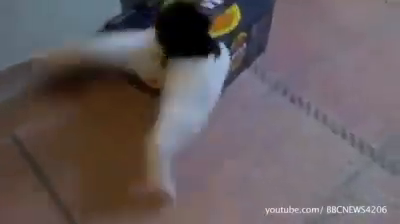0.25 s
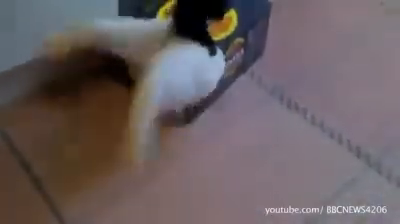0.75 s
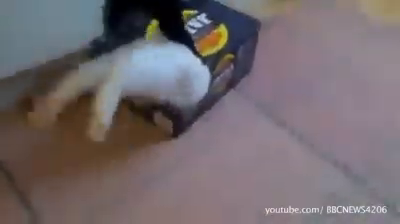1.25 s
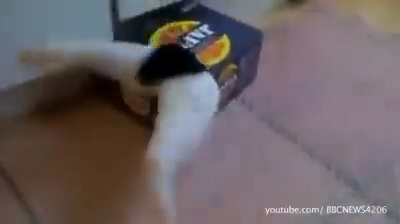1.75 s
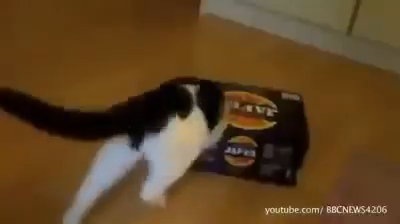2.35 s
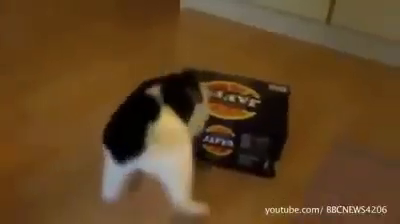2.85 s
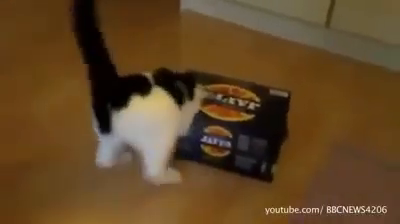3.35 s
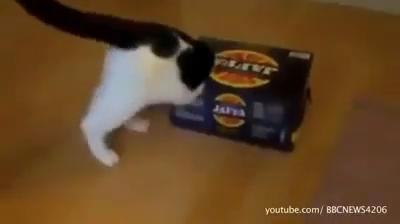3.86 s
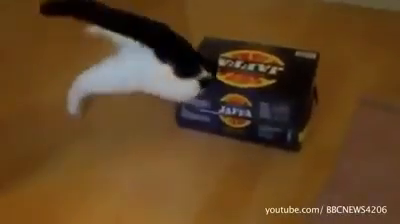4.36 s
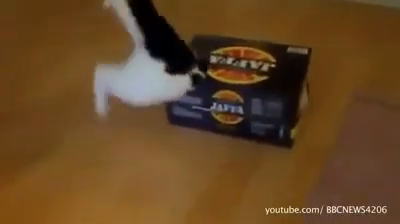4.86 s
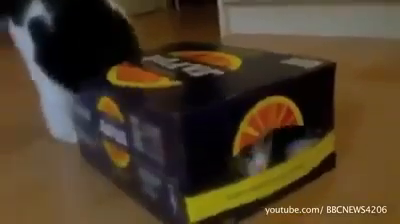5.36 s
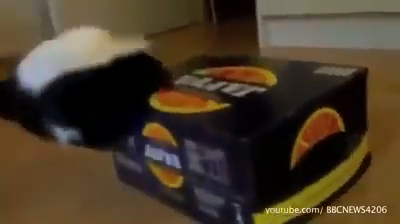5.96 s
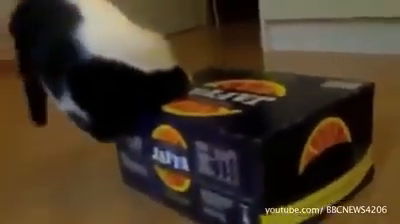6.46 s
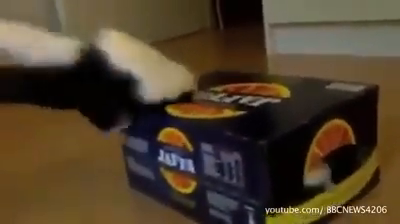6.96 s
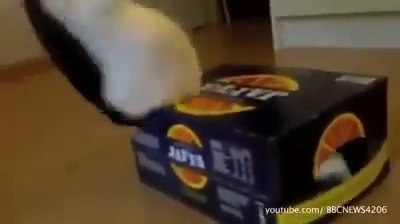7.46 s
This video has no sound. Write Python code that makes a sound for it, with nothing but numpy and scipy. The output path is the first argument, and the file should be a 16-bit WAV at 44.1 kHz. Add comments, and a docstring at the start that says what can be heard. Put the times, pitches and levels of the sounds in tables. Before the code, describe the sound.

Cardboard drags and stutters over tiles then wood indoors, claws ticking and scratching, flaps rattling, two hard boxy thumps late, over faint hiss and hum.

```python
"""Kitten pushing a cardboard box

A kitten shoves its head into a box and pushes it over tiles, then over a wooden floor, then close by.
Shaped showers of tiny slips make the dragging strokes and claw scratches; narrow noise makes brief chatter.
Short rings with a snap make ticks, damped box modes make knocks, and showers of dull contacts rattle the flaps.
A decaying noise tail is the bare room; the camera adds hiss, sine-wave mains hum and low handling rumble."""
import sys
import numpy as np
from scipy import signal
from scipy.fft import rfft, irfft, next_fast_len
from scipy.io import wavfile
from scipy.ndimage import map_coordinates

SR = 44100
rng = np.random.default_rng(int(sys.argv[2]) if len(sys.argv) > 2 else 0)


def master(y):
    """Save y as 16-bit WAV."""
    cut = np.clip(np.atleast_2d(y).T, -1, 1)
    pcm = np.round(cut * 32767)  # scale
    wavfile.write(sys.argv[1], SR, pcm.astype(np.int16))


N = 339383

# pushes that slide the box: (start [s], rise [s], hold [s], fade t60 [s], drag [dB], claw scratch re drag [dB])
PUSH_STROKES = [(-.03, 0.037, 0.0031, .4, -35, -9.5), (.01, 0.093, 0, 0.7, -26, -4.5),
                (0.351, 0.05, 0.029, 0.23, -43.5, -7.5), (0.493, 0.085, 0, 1.04, -43.5, -9),
                (0.682, 0.027, 0.0066, 0.72, -32.5, -6), (0.852, 0.011, 0.063, 0.37, -45.5, -3.5),
                (0.938, 0.039, 0.031, 0.2, -51, -3.5), (1.413, .05, 0.033, 2.5, -51, -8.5),
                (1.475, 0.068, 0.052, 0.32, -38, -11.5), (1.978, 0.036, 0.017, 0.19, -43.5, -0.5),
                (2.398, 0.012, 0.03, 0.24, -37.5, 0), (2.454, 0.02, 0.038, 4.4, -51, -8),
                (2.71, 0.042, 0, 0.31, -44.5, 3), (2.85, 0.046, 0.02, 0.42, -44.5, 10),
                (2.91, 0.039, 0.0045, .3, -38.5, 8.5), (3.021, 0.03, 0.022, 0.39, -42, 4),
                (3.091, 0.12, 0.1, 1.35, -44.5, -2.5), (3.282, 0.032, 0.028, 0.14, -50, 7.5),
                (3.461, 0.088, 0.042, 0.091, -44.5, 4.5), (3.568, 0.026, 0, 0.019, -44.5, 19),
                (3.635, 0.024, 0.1, 1.1, -41.5, -7), (3.714, 0.053, 0.015, 0.33, -37.5, -1.5),
                (3.824, 0.043, 0.085, 1.1, -39.5, -3.5), (3.97, 0.092, 0.018, 0.073, -44.5, 1.5),
                (4.134, .017, 0.0063, 0.37, -37.5, 5), (4.146, 0.03, 0, 0.088, -41, 18.5),
                (4.186, 0.064, 0.00099, 0.84, -32.5, 2.5), (4.378, 0.046, 0.079, 0.33, -39.5, -7),
                (4.447, .12, 0.0058, 3.96, -46.5, -4), (5.668, 0.024, 0.068, 1.03, -41.5, -9.5),
                (5.97, 0.11, 0.032, 0.72, -37, -7.5), (6.313, 0.026, 0.069, 2, -49.5, -6),
                (6.553, 0.14, .02, 1, -51, -5), (6.856, 0.065, 0.095, 1, -51.5, -7.5),
                (6.992, 0.084, 0.047, 1.31, -32, -14.5), (7.321, 0.037, 0, .6, -33.5, -14.5),
                (7.49, 0.072, .08, .5, -50, -7.5), (7.614, 0.023, 0.12, .5, -40.5, -8.5)]
# friction colour on tiles, on wood and close by: (frequency [Hz], relative level [dB])
TILE_FRICTION = [(90, -12.5), (250, -7.5), (600, -4.5), (950, 5.5), (1300, 4), (1900, 4.5), (2550, 2),
                 (3600, -6.5), (4600, -13.5), (6000, -21.5), (7500, -38), (10000, -61)]
WOOD_FRICTION = [(70, -14.5), (160, -1.5), (450, 0), (900, -6), (1500, -7), (2400, -8), (3200, -5),
                 (4000, -2.5), (5000, -6), (6000, -10.5), (7000, -22.5), (8000, -33), (10000, -51.5)]
NEAR_FRICTION = [(90, -28), (250, -7), (600, -8), (850, 0), (1150, 3), (1500, 0), (2000, 0), (2900, -7.5),
                 (3500, -13.5), (4300, -15), (5000, -18), (6300, -25), (7500, -39.5), (10000, -62.5)]
# resonances of a chattering card edge: (start [s], end [s], centre [Hz], width [Hz], level fully swelled [dB])
EDGE_CHATTER = [(1.999, 2.066, 875, 252, -38.5), (2.738, 2.816, 2720, 415, -42.5),
                (2.922, 3.01, 3730, 305, -36.5), (3.652, 3.93, 1090, 260, -45),
                (4.024, 4.107, 5750, 302, -47.5), (4.139, 4.24, 4050, 524, -33.5),
                (4.381, 4.437, 3740, 250, -38), (7.016, 7.17, 1106, 70, -36.5),
                (7.053, 7.333, 3700, 1000, -52), (7.626, 7.742, 2270, 280, -40),
                (7.62, 7.742, 3530, 595, -47.5)]
# claws and flap edges ticking on card: (time [s], peak [dB], panel [Hz], ring t60 [s], snap re ring [dB])
CARD_TAPS = [(0.161, -17, 2500, .018, 4), (0.6502, -19, 870, 0.0061, 12), (0.696, -17.5, 1316, 0.005, -2.5),
             (0.72, -18.5, 2550, .018, -7), (0.873, -26, 1480, 0.017, 9.5),
             (1.433, -35.5, 1290, 0.0095, -2), (1.532, -21.5, 1600, 0.012, -2), (1.993, -20, 745, 0.02, 3),
             (1.997, -22, 956, 0.02, -5), (2.0215, -18.5, 880, 0.016, 6.5), (2.023, -24, 4720, .009, 4),
             (2.409, -22.5, 825, .014, 11), (2.735, -15, 2890, .0097, 6), (2.858, -28, 4020, .012, 5),
             (2.941, -17, 4370, 0.013, 2.5), (3.056, -24, 5260, 0.0097, 4.5),
             (3.588, -16.5, 4080, 0.025, 3), (3.662, -23.5, 1150, 0.019, -2.5),
             (4.149, -15.5, 840, 0.02, 12), (4.173, -15, 4270, .01, 0), (4.2393, -17.5, 3900, 0.0055, 1),
             (4.3955, -18, 3750, 0.007, -3.5), (4.435, -22.5, 1320, 0.014, 0), (4.866, -26, 1170, 0.005, 9),
             (7.339, -11.5, 1456, .0065, -9.5), (7.3685, -21, 1840, 0.019, -14),
             (7.636, -21, 2310, .019, 6)]
# box buckling and knocking on the floor: (time [s], peak before bass cut [dB], boost of the hollow mode [dB])
BOX_KNOCKS = [(5.68, -6, -4.5), (5.7007, -26.5, -14), (5.706, -26.5, 1), (5.7117, -19.5, 1.5),
              (5.7557, -32, 2), (5.7575, -29, -2), (6.348, -22, 1.5), (6.356, -26, 12.5), (6.377, -25.5, 9),
              (7.341, -6, 10.5), (7.3623, -22, 0.5), (7.3702, -22, 19), (7.3772, -20.5, 7)]
# hollow, lid, side and base-sway modes: (mean pitch [Hz], relative level [dB], t60 before blow scaling [s])
BOX_MODES = [(545, 19.5, 0.021), (1137, 21.5, 0.014), (890, -26, 0.0053), (95, -42, 0.026)]
# colour of a sharp release or crack of the card: (frequency [Hz], relative level [dB])
SNAP_COLOUR = [(100, 1), (600, -5), (2000, 12.5), (4300, 9.5), (6000, -6.5), (8000, -27.5), (10000, -56)]
# loose flaps rattling after a knock, a tap or a shove: (time [s], level [dB], t60 [s])
FLAP_RATTLES = [(1.995, -40.5, 0.24), (4.15, -33, 0.56), (5.686, -27, 0.25), (5.751, -26.5, 0.2),
                (6.346, -32.5, 0.58), (7.352, -31, 0.47), (7.38, -38, 0.96)]
# colour of the flap contacts: (frequency [Hz], relative level [dB])
FLAP_COLOUR = [(70, -18), (160, 0), (300, 3), (550, 3), (800, 3), (1150, 3.5), (1600, -7), (2100, -7),
               (3000, -33), (5500, -36.5), (9000, -59.5)]
# reverberation of the bare room: (frequency [Hz], t60 [s])
ROOM_DECAY = [(150, 0.63), (1000, 0.66), (4000, 0.53), (9000, 0.55)]
# faint stereo width, side level of a noise tail by frequency: (frequency [Hz], side level [dB])
SIDE_WIDTH = [(100, -29.5), (700, -36.5), (1400, -35.5), (2500, -27.5), (5000, -28), (7000, -35)]
# colour of the hiss before its low cut: (frequency [Hz], relative level [dB])
HISS_COLOUR = [(50, -20.5), (120, -8.5), (250, -9), (500, -14.5), (1000, -16), (2000, -19), (4000, -24.5),
               (5500, -27), (7000, -36), (10000, -62.5)]
# mains hum harmonics: (frequency [Hz], rms level [dB])
MAINS_HUM = [(50, -76), (100, -70.5), (150, -68), (250, -69), (300, -83), (350, -85.5), (500, -68.5),
             (700, -69), (1150, -73), (1200, -72.5)]
# tremor of the hand on the camera: (time [s], rumble level [dB])
HAND_TREMOR = [(0, -61), (4.4, -64), (5.2, -67), (7.7, -84)]
# shifts of the grip: (time [s], added rumble level [dB], t60 [s])
GRIP_BUMPS = [(.68, -42.5, 0.64), (1.2, -53.5, 1.5)]

# where the box is pushed: (from [s], to [s])
ON_TILES, ON_WOOD, CLOSE_BY = (-1, 2.36), (2.36, 5.6), (5.6, 7.7)
SWELL_POWER = 1.37  # a slide gathers speed as this power of time
REFERENCE_DB = -40  # drag level at which flex_db sets the flex
RING_FACTOR, RING_GROWTH = 0.96, 0.29  # ring scaling of a full-scale knock; its growth as a power of the blow
CRACK_DB, CRACK_SLOPE = -26.5, -0.26  # crack re thump in a full-scale knock; its change per dB of blow
TOP_HZ = 10100


def scrape(span, colour, flex_db, flex_growth, flex_hz, claw_hz, rate, spread_db, clump_db):
    """Stick-slip friction: the base drags in the middle range, claws scratch above it, the walls flex below."""
    drag_level, claw_level = pushes(span)
    # the walls give even under a light push, so their level grows more slowly than the drag
    flex_level = amp(REFERENCE_DB + flex_db) * (drag_level / amp(REFERENCE_DB)) ** flex_growth

    def rub(band):
        """A fresh shower of slips, coloured by the surface and kept to one band."""
        grains = slips(rate, spread_db, clump_db)
        return unit(filtered(grains, lambda hz: amp(along(colour, hz)) * band(hz)))

    drag = rub(lambda hz: above(hz, flex_hz, order=6) * below(hz, claw_hz, order=6))
    claws = rub(lambda hz: above(hz, claw_hz, order=8))
    flex = rub(lambda hz: below(hz, flex_hz, order=6))
    return drag_level * drag + claw_level * claws + flex_level * flex


def pushes(span):
    """Drag and claw levels of the pushes that start in a span: each swells, holds, then dies as the box stops."""
    t = np.arange(N) / SR
    drag_power, claw_power = np.zeros(N), np.zeros(N)
    for start, rise, hold, t60, db, claw_db in PUSH_STROKES:
        if span[0] <= start < span[1]:
            swell = np.clip((t - start) / rise, 0, 1) ** SWELL_POWER
            fade_db = -60 * np.maximum(t - start - rise - hold, 0) / t60
            power = (swell * amp(db + np.maximum(fade_db, -120))) ** 2
            drag_power += power
            claw_power += power * amp(claw_db) ** 2
    return np.sqrt(drag_power), np.sqrt(claw_power)


def slips(rate, spread_db, clump_db):
    """Sparse random impulses, rate per second, of either sign and uneven size; clump_db sways their strength."""
    chosen = rng.random(N) < rate / SR
    sizes = rng.choice([-1, 1], N) * amp(spread_db * rng.standard_normal(N))
    return chosen * sizes * amp(clump_db * wobble(130))


def chatter(rise_s=0.019, fall_s=0.041):
    """An edge locks on to one resonance for a moment: a short swell of narrow-band noise."""
    t, out = np.arange(N) / SR, np.zeros(N)
    for start, end, centre_hz, width_hz, db in EDGE_CHATTER:
        noise = rng.standard_normal(N)
        ring = unit(filtered(noise, lambda hz: 1 / (1 + (2 * (hz - centre_hz) / width_hz) ** 2)))
        swell = np.clip(np.minimum((t - start) / rise_s, (end - t) / fall_s), 0, 1)
        out += amp(db) * swell * ring
    return out


def taps(snap_s=0.00093, attack_s=0.00034, let_go_s=0.001284, crackle_db=-19):
    """Each tick is one sharp release amid a brief crackle, and a short ring of the panel that was touched."""
    out, t = np.zeros(N), np.arange(SR // 10) / SR
    for s, db, panel_hz, t60, snap_db in CARD_TAPS:
        ring = np.sin(2 * np.pi * panel_hz * t) * dying(t, t60) * (1 - np.exp(-t / attack_s))
        crackle = amp(crackle_db) * rng.standard_normal(len(t)) * peaked(t * np.exp(-t / snap_s))
        release = np.sinc((t - let_go_s) * SR)
        snap = filtered(release + crackle, lambda hz: amp(along(SNAP_COLOUR, hz)))
        tick = peaked(ring) + amp(snap_db) * peaked(snap)
        add(out, s, amp(db) * peaked(tick))
    return out


def knocks(contact_s=0.0011, thud_s=0.00045, thud_db=3, crack_s=0.0007, bass_hz=90):
    """A soft blow pushes the wall once, cracks the card and rings the heavily damped modes of the box."""
    out, t = np.zeros(N), np.arange(SR // 10) / SR
    lead = SR // 100  # silent lead-in for the zero-phase filter
    for s, db, hollow_db in BOX_KNOCKS:
        crack_db = CRACK_DB + CRACK_SLOPE * db
        length = RING_FACTOR * amp(db) ** RING_GROWTH  # harder blows ring longer
        modes = []
        for hz, level, t60 in BOX_MODES:
            pitch = hz * rng.normal(1, 0.0064)  # every blow lands a little differently in pitch
            modes.append(amp(level) * dying(t, t60 * length) * np.sin(2 * np.pi * pitch * t))
        hollow, *panels = modes
        ring = (amp(hollow_db) * hollow + sum(panels)) * (1 - np.exp(-t / contact_s))
        # the wall gives way and springs back in one broad pulse
        push = amp(thud_db) * peaked(t * (2 - t / thud_s) * np.exp(-t / thud_s))
        burst = rng.standard_normal(len(t)) * t * np.exp(-t / crack_s)
        crack = filtered(burst, lambda hz: amp(along(SNAP_COLOUR, hz)))
        thump = filtered(np.pad(ring + push, (lead, 0)), lambda hz: below(hz, 2000, order=4))[lead:]
        add(out, s, -amp(db) * peaked(peaked(thump) + amp(crack_db) * peaked(crack)))
    # a small box radiates little bass
    return filtered(out, lambda hz: (1j * hz / (bass_hz + 1j * hz)) ** 2)


def dying(t, t60, grip=1.4):
    """The pressing paw damps the card ever harder, so a ring ends abruptly."""
    return amp(-60 * (t / t60) ** grip)


def rattles(rise_s=0.003):
    """A dying shower of tiny dull contacts between flaps and walls."""
    t = np.arange(SR) / SR
    power = np.zeros(N)
    for s, db, t60 in FLAP_RATTLES:
        level = amp(db - 60 * t / t60) * (1 - np.exp(-t / rise_s))
        add(power, s, level ** 2)
    contacts = slips(rate=2600, spread_db=3.5, clump_db=0)
    return np.sqrt(power) * unit(filtered(contacts, lambda hz: amp(along(FLAP_COLOUR, hz))))


def room(x):
    """Hard floor and walls: after 10 ms comes a noise tail in which each frequency dies at its own speed."""
    hz, t, z = signal.stft(rng.standard_normal(SR), SR, nperseg=256)
    decay = amp(-60 * t / along(ROOM_DECAY, hz)[:, None])
    tail = signal.istft(z * decay, SR, nperseg=256)[1]
    return signal.fftconvolve(np.pad(x, (SR // 100, 0)), tail / np.linalg.norm(tail))[:N]


def background(hiss_db=-56, rumble_hz=75, bump_rise_s=0.016):
    """Steady shaped-noise hiss, sine-wave mains hum and the low-noise rumble of the hand on the camera."""
    t = np.arange(N) / SR
    hiss = unit(filtered(rng.standard_normal(N),
                         lambda hz: amp(along(HISS_COLOUR, hz)) * above(hz, 110, order=2)))
    hum = np.zeros(N)
    for hz, db in MAINS_HUM:
        hum += np.sqrt(2) * amp(db) * np.sin(2 * np.pi * (hz * t + rng.random()))
    rumble = unit(filtered(rng.standard_normal(N),
                           lambda hz: below(hz, rumble_hz, order=3) * above(hz, 10, order=2)))
    grip = amp(curves(HAND_TREMOR)[0])
    for s, db, t60 in GRIP_BUMPS:
        add(grip, s, amp(db - 60 * t / t60) * (1 - np.exp(-t / bump_rise_s)))
    return amp(hiss_db) * hiss + hum + grip * rumble


def amp(db):
    """Decibels to gain."""
    return 10 ** (np.asarray(db) / 20)


def unit(x):
    """Scale to rms 1."""
    return x / np.sqrt(np.mean(x ** 2) + 1e-20)


def peaked(x):
    """Scale to peak 1."""
    return x / np.max(np.abs(x))


def along(points, hz):
    """Read (Hz, value) points on a log frequency axis."""
    f, v = np.transpose(points)
    return np.interp(np.log(hz + 1), np.log(f + 1), v)


def curves(rows):
    """One value per sample for each column after the time."""
    s, *cols = np.transpose(rows)
    return [np.interp(np.arange(N) / SR, s, c) for c in cols]


def wobble(rate):
    """A smooth random curve, rate knots a second."""
    knots = rng.standard_normal(int(N * rate / SR) + 4)
    return map_coordinates(knots, [np.arange(N) * rate / SR])


def filtered(x, response):
    """x shaped by a gain that depends on frequency."""
    n = x.shape[-1]
    m = next_fast_len(n + SR // 10)
    return irfft(rfft(x, m) * response(np.fft.rfftfreq(m, 1 / SR)), m)[..., :n]


def below(hz, edge_hz, order):
    """Low-pass gain."""
    return 1 / np.sqrt(1 + (hz / edge_hz) ** (2 * order))


def above(hz, edge_hz, order):
    """High-pass gain."""
    return (hz / edge_hz) ** order * below(hz, edge_hz, order)


def add(track, s, sound):
    """Mix a sound into the track at a time in seconds."""
    part = track[max(round(s * SR), 0):][:len(sound)]
    part += sound[:len(part)]


def scene():
    """The box in the room over its background, almost in mono, with a faint wide noise tail."""
    tiles = scrape(ON_TILES, TILE_FRICTION, flex_db=-9.5, flex_growth=0.57, flex_hz=682, claw_hz=2770,
                   rate=4500, spread_db=2.0, clump_db=0.84)
    wood = scrape(ON_WOOD, WOOD_FRICTION, flex_db=-9.0, flex_growth=0.53, flex_hz=710, claw_hz=2660,
                  rate=7000, spread_db=0.5, clump_db=0.53)
    near = scrape(CLOSE_BY, NEAR_FRICTION, flex_db=-6.5, flex_growth=0.51, flex_hz=694, claw_hz=3030,
                  rate=4500, spread_db=0.5, clump_db=0.4)
    box = tiles + wood + near + chatter() + taps() + knocks() + rattles()
    bed = background()
    mid = box + amp(-17.0) * room(box) + bed
    # a second noise tail, of box and bed together, gives the faint width
    side = filtered(room(box + bed), lambda hz: amp(along(SIDE_WIDTH, hz)))
    return np.array([mid + side, mid - side])


def record(dry):
    """The camera keeps nothing above its band limit."""
    return filtered(dry, lambda hz: hz < TOP_HZ)


dry = scene()
out = record(dry)
master(out)
```